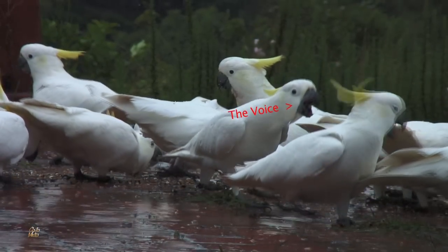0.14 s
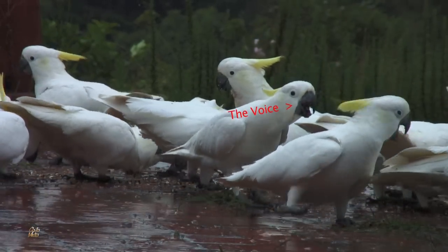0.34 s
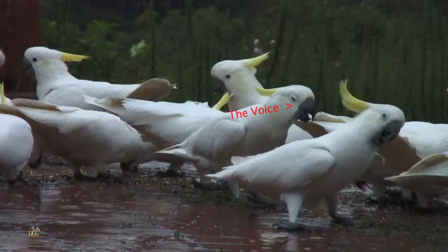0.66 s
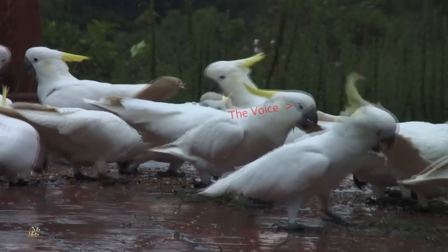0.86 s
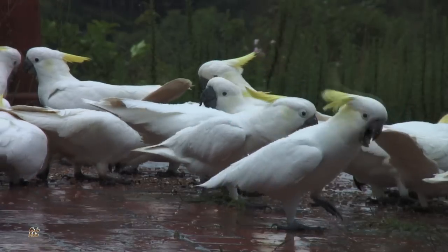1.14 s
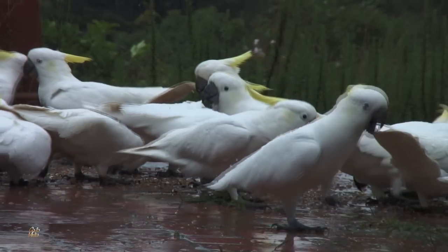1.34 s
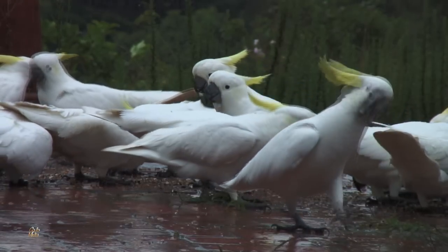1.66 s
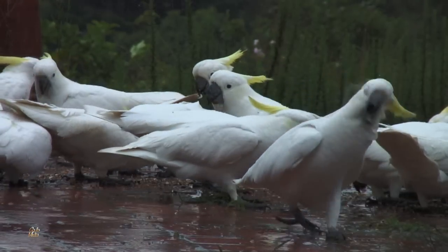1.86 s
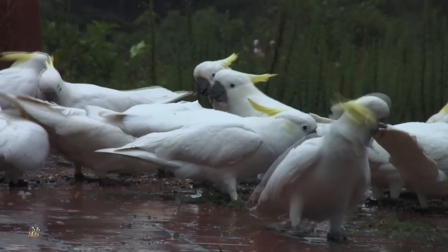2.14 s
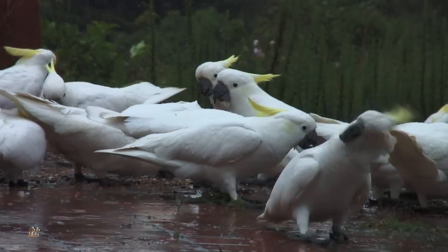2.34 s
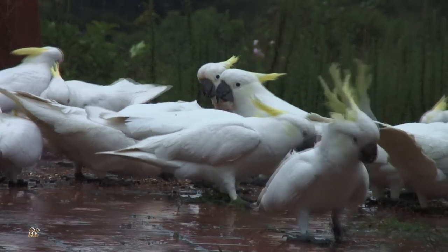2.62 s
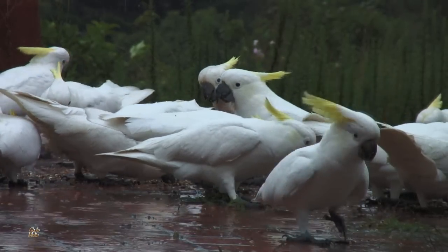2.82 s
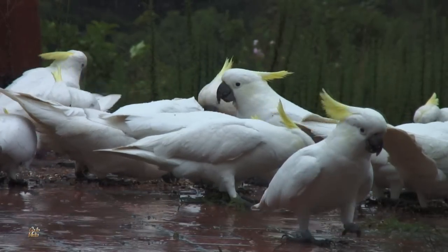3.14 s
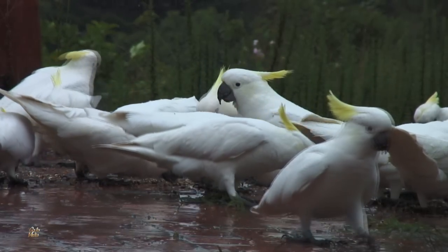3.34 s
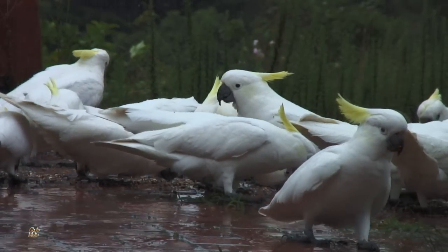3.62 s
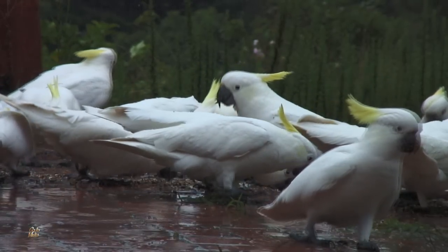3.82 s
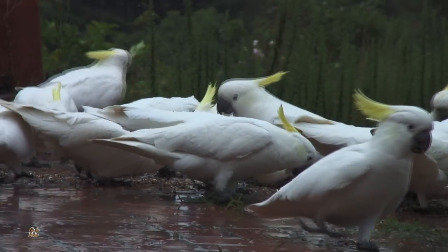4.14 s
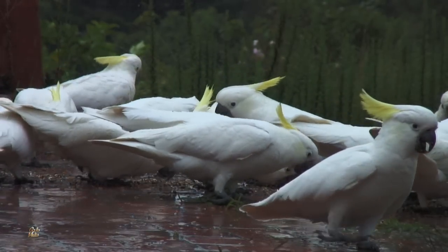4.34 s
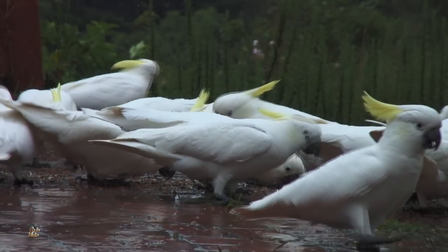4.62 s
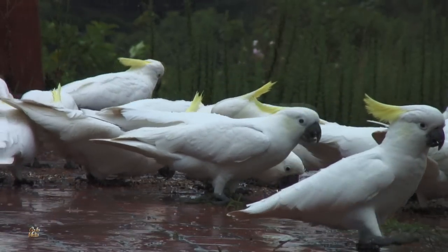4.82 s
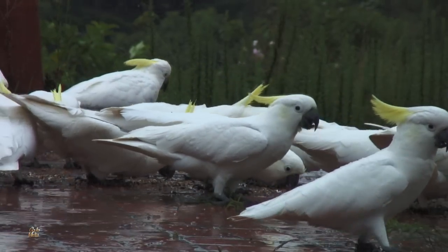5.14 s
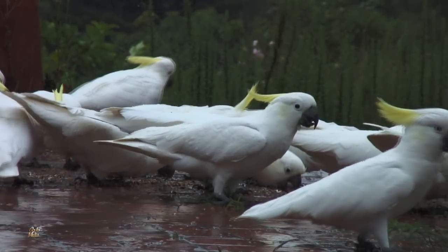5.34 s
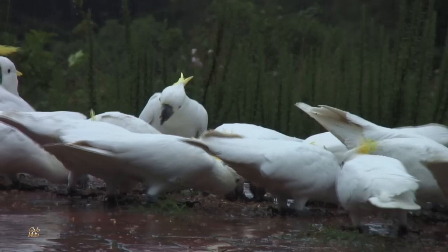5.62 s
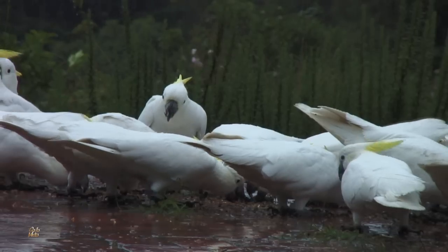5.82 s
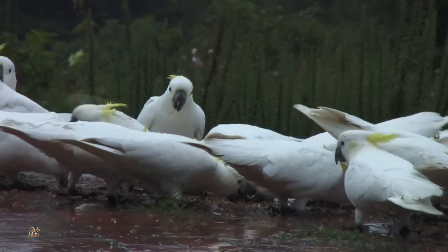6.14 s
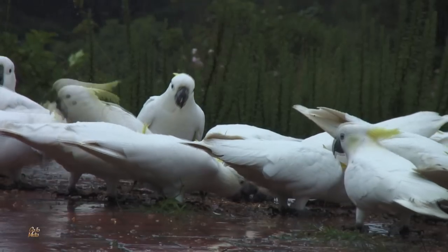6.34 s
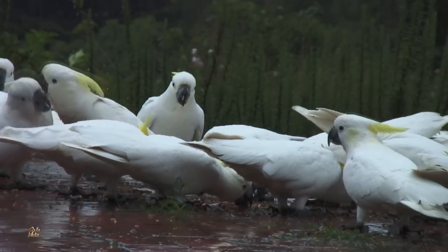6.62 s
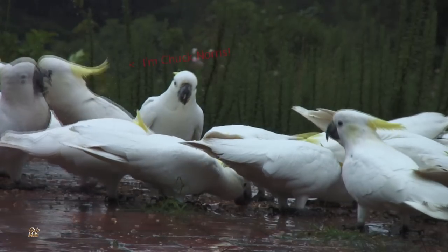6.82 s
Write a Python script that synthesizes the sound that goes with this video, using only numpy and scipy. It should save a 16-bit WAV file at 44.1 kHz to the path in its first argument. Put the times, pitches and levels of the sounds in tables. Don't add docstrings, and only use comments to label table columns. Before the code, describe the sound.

Outdoors, a feeding cockatoo flock squabbles close to the microphone. Raspy screeches overlap from the start, some slightly distorted with a low thump, mixed with whistle-led squeals and chirps. After about three and a half seconds the birds fall nearly quiet, leaving a soft wash and faint hum; a short screech and a pinched squawk follow, then a squeal and a long harsh closing screech.

```python
import sys
import numpy as np
from scipy import signal
from scipy.io import wavfile
from scipy.ndimage import uniform_filter1d

SR = 44100
rng = np.random.default_rng(int(sys.argv[2]) if len(sys.argv) > 2 else 0)


def voltage_ratio(decibels):
    exponent = np.asarray(decibels, float) / 20
    return 10 ** exponent


def unload_wav(signal):
    wavfile.write(
        sys.argv[1],
        SR,
        np.round(np.clip(np.atleast_2d(signal).T, -1, 1) * 32767).astype(np.int16),
    )


N = 307377

# frequency in Hz, level in dB.
RASP = [(300, -39), (3000, -13), (4500, -11.5), (6000, 1), (7060, -12), (7790, -1), (8600, -15.5),
        (9490, -3), (10500, -11), (11500, -9), (13000, -30), (16000, -37)]

BLUNT = dict(peak=.3, under_db=2, sag_db=3.2, release_s=.051, rasp_db=-22.5, windpipe=.42, shift_hz=50)
BRIGHT = dict(peak=.25, under_db=2.5, sag_db=1.1, release_s=.061, rasp_db=-15.5, windpipe=.32, shift_hz=-20)
SWELLING = dict(peak=.6, under_db=9, sag_db=2.6, release_s=.051, rasp_db=-19.5, windpipe=.38, shift_hz=100)
AWAY = dict(peak=.4, under_db=4, sag_db=2.4, release_s=.051, rasp_db=-29.5, windpipe=.55, shift_hz=130)
SQUAWK = dict(peak=.26, under_db=7, sag_db=2, release_s=.1, rasp_db=-25, windpipe=0, shift_hz=-250)

GLIDE = dict(bend=1.1, peak=.5, ends_db=-8.5, extra_db=2)
HOOK = dict(bend=5, peak=3, ends_db=-10.5, extra_db=-2.5)
COO = dict(bend=.5, peak=0, ends_db=-8.5, extra_db=12)
REED = dict(bend=.7, peak=1.5, ends_db=-9, extra_db=-2)


def evened(x):
    return x / np.sqrt(np.mean(x ** 2) + 1e-20)


def levelled(x):
    return x / np.sqrt(abs(uniform_filter1d(x ** 2, size=1800)) + 1e-12)


def read(points, hz):
    f, value = np.transpose(points)
    return np.interp(np.log(hz + 1), np.log(f + 1), value)


def wobble(count, hz):
    slow = signal.butter(2, hz, fs=SR, output="sos")
    return evened(signal.sosfilt(slow, rng.standard_normal(count)))


def resonate(x, hz, width):
    turn = np.exp(2j * np.pi * np.cumsum(hz * np.ones(len(x))) / SR)
    r = np.exp(-np.pi * width / SR)
    smooth = signal.lfilter([(1 - r) ** 2], [1, -2 * r, r * r], x / turn + 1e-18)
    return 2 * (turn * smooth).real


def causal(points):
    gain = read(points, abs(np.fft.fftfreq(4096, 1 / SR))) * np.log(10) / 20
    return np.fft.ifft(np.exp(gain - 1j * signal.hilbert(gain).imag)).real[:1024]


def unfold(rows):
    s, *columns = np.transpose(rows)
    t = np.arange(s[0], s[-1], 1 / SR)
    return s[0], [np.interp(t, s, c) for c in columns]


def wash():
    # frequency in Hz, level in dB per Hz.
    wash_colour = [(18, -66), (30, -54), (140, -10.5), (324, -3.5), (389, -3), (787, -3.5), (897, -1.5),
                   (1590, -3.5), (2300, -12), (4090, -14), (6720, -24), (11300, -25.5), (15500, -44)]
    frames, hz = N // 256 + 5, np.fft.rfftfreq(1024, 1 / SR)
    a, b, patches = rng.standard_normal((frames, 513, 3)).T
    patches = uniform_filter1d(patches, size=12, axis=0)
    patches = evened(uniform_filter1d(patches, size=16, axis=1))
    swell = evened(uniform_filter1d(rng.standard_normal(frames), size=30))
    z = (a + 1j * b) * voltage_ratio(read(wash_colour, hz)[:, None] + 1.5 * patches + .6 * swell)
    return evened(signal.istft(z, nperseg=1024, noverlap=768)[1][:N])


def mains_hum():
    return np.sqrt(2) * voltage_ratio(-63.5) * np.sin(2 * np.pi * 150.4 * np.arange(N) / SR)


def chatter():
    # time in seconds, level in dB.
    chatter_levels = [(0, -48), (0.851, -38.5), (2.2, -39), (2.25, -38.5), (2.95, -38.5), (3.13, -38.5),
                      (3.25, -37.5), (3.5, -49.5), (5.2, -50), (5.35, -46), (6, -49.5), (6.2, -40.5),
                      (6.97, -43.5)]
    a, b, c = voltage_ratio(2.2 * wobble(count=N, hz=60)) * rng.standard_normal((N, 3)).T
    blur = resonate(a, 2300, 2540)
    blur += voltage_ratio(-5.0) * resonate(b, 4280, 1730)
    blur += voltage_ratio(1.5) * resonate(c, 1300, 920)
    return voltage_ratio(np.interp(np.arange(N) / SR, *np.transpose(chatter_levels))) * evened(blur)


def screech_shape(start, length, effort_db, first_hz, last_hz,
                  peak, under_db, sag_db, release_s, rasp_db, windpipe, shift_hz):
    attack_s = .022
    t = np.maximum.accumulate([0, attack_s, peak * length, length - release_s, length])
    drop_db = np.array([-12 - under_db, -under_db, 0, -sag_db, -20 - sag_db])
    hz = first_hz + (last_hz - first_hz) * t / length
    share = np.clip(windpipe + .02 * drop_db, 0, 1)
    throat_hz = 2418 + shift_hz + 1.57 * (hz - 1000)
    rasp = rasp_db + .73 * drop_db + 4.5 * (t / length - .5)
    return np.transpose([start + t, effort_db + drop_db, hz, share, throat_hz, rasp])


def screech(rows):
    s, (effort_db, hz, windpipe, throat_hz, rasp_db) = unfold(rows)
    n = len(hz)
    turns = np.cumsum(hz * np.exp(.04 * wobble(count=n, hz=200) + .025 * wobble(count=n, hz=18))) / SR

    kicks = np.cumsum(180 * np.exp(.45 * wobble(count=n, hz=79.35))) / SR
    burst = uniform_filter1d(np.exp(-3 * (kicks % 1)), size=20)
    burst = evened(signal.detrend(burst)) + .4 * wobble(count=n, hz=150)

    stack = np.zeros(n)
    for k in range(2, 7):
        throat = 1 / (1 + ((k * hz - throat_hz) / 470) ** 2) + voltage_ratio(-15.0 - 6.5 * k * hz / 1000)
        stack += throat * np.cos(2 * np.pi * k * turns + k * k / 2)
    torn = evened(stack) * (.7 + np.tanh(1.2 * wobble(count=n, hz=230)))
    torn += 1.1 * windpipe * np.cos(2 * np.pi * turns) * (.8 + .8 * wobble(count=n, hz=140))

    a, b, c, d = rng.standard_normal((n, 4)).T
    air = resonate(a, throat_hz, 435)
    air += voltage_ratio(-11.5) * resonate(b, 3550, 2120)
    air += voltage_ratio(-4.5) * windpipe * resonate(c, .88 * hz, 640)

    body = voltage_ratio(1.6 * burst) * (evened(torn) + .9 * evened(air))
    body -= .7 * resonate(body, np.minimum(1.66 * hz, 1700), 520)

    snaps = np.diff(np.floor(turns), prepend=0) * voltage_ratio(4.5 * d)
    rasp = voltage_ratio(2.45 * burst) * (evened(snaps) + .5 * a)
    rasp = signal.oaconvolve(rasp, causal(RASP))[:n]
    rasp_gain = voltage_ratio(rasp_db + 2.5 + 2.2 * wobble(count=n, hz=15))
    return s, voltage_ratio(effort_db) * (levelled(body) + rasp_gain * levelled(rasp))


def purity(hz):
    return 3 + 8.5 * (hz / 1000 - 1)


def swoop_shape(s, lead_s, lead_hz, lead_db, swoop_db):
    # time in seconds, level in dB under the swoop level, pitch as a ratio to the lead-in.
    swoop_path = [(0, 0, 1), (.01, -3.5, .86), (.022, 0, .775), (.028, -14, .73)]
    t, db, ratio = np.transpose(swoop_path)
    times = s + np.r_[-lead_s, -.6 * lead_s, t]
    levels = np.r_[lead_db - 6, lead_db, lead_db, swoop_db + db[1:]]
    hz = lead_hz * np.r_[1.03, 1, ratio]
    return np.transpose([times, levels, hz, purity(hz)])


def chirp_shape(start, length, level_db, first_hz, last_hz, bend, peak, ends_db, extra_db):
    u = np.linspace(0, 1, num=24)
    hz = first_hz * (last_hz / first_hz) ** (u ** bend)
    db = ends_db * np.interp(u, [0, np.clip(peak, .1, .9), 1], [1, 0, 1]) ** 1.46
    return np.transpose([start + u * length, level_db + db, hz, purity(hz) + extra_db])


def chirp(rows):
    s, (level_db, hz, fall_db) = unfold(rows)
    n = len(hz)
    turns = np.cumsum(hz * np.exp(.0072 * wobble(count=n, hz=121))) / SR
    tone = np.zeros(n)
    for k in range(7):
        gain = voltage_ratio(-k * fall_db) / (1 + ((k + 1) * hz / 5700) ** 5)
        tone += gain * np.cos(2 * np.pi * (k + 1) * turns)
    gain = np.sqrt(2) * voltage_ratio(level_db + 1.2 * wobble(count=n, hz=90))
    return s, gain * tone * signal.windows.tukey(n, .08)


def squeal_shape(start, rough_s, clear_s, level_db, clear_hz):
    t = np.arange(0, rough_s + clear_s, .002)
    db = np.interp(t, [0, .011, .77 * rough_s, rough_s], [-12, -2.5, -5.5, 0])
    db -= 123 * np.maximum(t - rough_s - .04, 0)
    db -= 20 * np.clip(1 - (t[-1] - t) / .014, 0, 1)
    hz = np.interp(t, [0, .7 * rough_s, rough_s, rough_s + .049], [680.5, 638, 638, clear_hz])
    rough = np.interp(t, [0, rough_s, rough_s + .41 * clear_s], [.85, .454, .077])
    return np.transpose([start + t, level_db + db, hz, rough])


def squeal(rows):
    # multiple of the pitch, level in dB.
    overtones = [(1, -32), (2, -8), (3, -15), (4, -2.5), (5, -2), (6, -7.5), (7, -23), (8, -13.5), (9, -75),
                 (10, -20.5), (11, -47), (12, -25)]
    s, (level_db, hz, rough) = unfold(rows)
    n, rough = len(hz), np.clip(rough, 0, 1.5)
    turns = np.cumsum(hz * np.exp(.11 * rough * wobble(count=n, hz=300))) / SR
    stack = sum(voltage_ratio(db) * np.cos(2 * np.pi * k * turns + k * k / 2) for k, db in overtones)
    flutter = voltage_ratio(2.13 * rough * wobble(count=n, hz=255))
    air = rng.standard_normal(n)
    hiss = resonate(air, 3080, 1200) - voltage_ratio(-29) * resonate(air, 5600, 680)
    hiss += voltage_ratio(-21.5) * signal.oaconvolve(air, causal(RASP))[:n]
    return s, voltage_ratio(level_db) * levelled(flutter * (evened(stack) + 1.73 * rough * evened(hiss)))


def flock(*groups):
    mix = np.zeros(N)
    for voice, calls in groups:
        for rows in calls:
            s, sound = voice(rows)
            part = mix[round(s * SR):][:len(sound)]
            part += sound[:len(part)]
    t = np.arange(SR // 2) / SR
    scatter = rng.standard_normal(len(t)) * voltage_ratio(-60 * t / .22) * (t > .004)
    return mix + voltage_ratio(-10) * signal.oaconvolve(mix, scatter / np.linalg.norm(scatter))[:N]


def group(harsh, squeals, swoops, thin):
    screeches = [screech_shape(*r, **manner) for manner, rows in harsh for r in rows]
    whistles = [chirp_shape(*r, **manner) for manner, rows in thin for r in rows]
    whistles += [swoop_shape(*r) for r in swoops]
    return flock((screech, screeches), (squeal, [squeal_shape(*r) for r in squeals]), (chirp, whistles))


def centre_birds():
    # start in seconds, length in seconds, effort or level in dB,
    # first pitch in Hz, last pitch in Hz. Facing birds are bright, turned ones dull and hollow.
    facing = [
        (0, .155, -16, 1290, 1146),
        (6.46, .36, -14, 1040, 985),
    ]
    swells = [
        (.555, .21, -16.5, 1075, 861),
        (1.945, .13, -20.5, 965, 993),
        (2.52, 0.145, -25, 905, 886),
    ]
    blunt = [
        (.915, 0.44, -17.5, 858, 968.5),
        (1.3, 0.33, -14, 1051, 1089),
        (4.503, 0.25, -15, 981, 1028),
    ]
    turned = [(1.56, 0.22, -20.5, 1153, 1151), (1.75, 0.22, -27, 898, 889), (3.06, .22, -37.5, 1155, 1246),
              (2.61, .12, -33, 997, 1060), (4.485, 0.076, -29, 987, 976), (6.74, 0.12, -26.5, 950, 920)]
    squawks = [
        (5.477, .13, -21.5, 1168, 1191),
    ]
    chirps = [(1.815, .063, -30, 3410, 4300), (1.8, .095, -34, 1810, 2477), (1.89, 0.053, -31, 2380, 2300),
              (1.8, 0.11, -40, 2550, 3050), (2.497, 0.057, -37, 2050, 2250), (2.529, .03, -32, 2960, 3650),
              (2.548, 0.041, -30.5, 3680, 3600), (2.722, 0.029, -32, 2630, 2390),
              (2.722, .032, -24, 5260, 4780), (2.89, .1, -33, 2540, 2250),
              (3.051, 0.037, -30.5, 2600, 2070), (3.08, 0.074, -32.5, 2120, 2350),
              (3.13, 0.037, -42, 3300, 4330), (3.16, 0.096, -39, 2450, 2610),
              (3.4, 0.29, -46.5, 2463, 2460), (3.055, 0.098, -36, 3990, 4800), (3.13, .08, -41, 4790, 4580),
              (3.945, 0.043, -40, 3060, 3350), (3.945, .042, -41, 4080, 4460),
              (5.478, .13, -34, 2340, 2373), (4.241, 0.096, -46.5, 955, 940),
              (6.133, 0.03, -28, 3100, 3700), (6.15, 0.048, -40, 2620, 2480)]
    coos = [
        (1.965, .075, -25.5, 946, 934),
        (2.3, 0.132, -35.5, 896, 847),
    ]
    hooks = [
        (3.215, 0.065, -33.5, 4200, 3320),
        (3.78, .207, -47, 965, 1113),
        (6.04, .115, -30.5, 1977, 2470),
    ]
    reeds = [
        (5.48, 0.136, -42, 1165, 1182),
    ]
    # start in seconds, lead-in in seconds, lead-in in Hz, lead-in in dB, swoop in dB.
    swoops = [
        (2.698, .045, 4160, -42.5, -17),
        (6.316, .078, 3960, -31.5, -13),
    ]
    # start in seconds, rough part in seconds, clear part in seconds, level in dB, clear pitch in Hz.
    squeals = [
        (2.735, .1, 0.074, -19.5, 660),
        (3.274, .05, 0.3, -24.5, 613),
        (6.335, .095, .07, -15.5, 642),
    ]
    harsh = [(BLUNT, blunt), (BRIGHT, facing), (SWELLING, swells), (AWAY, turned), (SQUAWK, squawks)]
    return group(harsh, squeals, swoops, [(GLIDE, chirps), (HOOK, hooks), (COO, coos), (REED, reeds)])


def left_birds():
    # start in seconds, length in seconds, effort or level in dB,
    # first pitch in Hz, last pitch in Hz.
    facing = [
        (0, .385, -15, 985, 1000),
    ]
    turned = [
        (.54, 0.216, -25, 1009, 1000),
        (2.23, .35, -21, 1058, 1149),
    ]
    swells = [
        (1.31, .21, -16.5, 1050, 880),
    ]
    blunt = [
        (1.665, .49, -17.5, 857, 1040),
    ]
    chirps = [
        (3.41, 0.156, -44, 613, 600),
    ]
    # start in seconds, lead-in in seconds, lead-in in Hz, lead-in in dB, swoop in dB.
    swoops = [
        (.395, .045, 4190, -32.5, -13),
    ]
    # start in seconds, rough part in seconds, clear part in seconds, level in dB, clear pitch in Hz.
    squeals = [
        (.42, 0.0722, 0.067, -16, 668),
    ]
    harsh = [(BLUNT, blunt), (BRIGHT, facing), (SWELLING, swells), (AWAY, turned)]
    return group(harsh, squeals, swoops, [(GLIDE, chirps)])


def scene():
    left_end_s = 3.705
    hum = mains_hum()
    birds = [centre_birds() + chatter(), left_birds()]
    no_bass = signal.butter(3, 330, "highpass", fs=SR, output="sos")
    centre, left = signal.sosfilt(no_bass, birds)
    centre += voltage_ratio(-42) * wash() + hum
    left += voltage_ratio(-47) * wash() + 1.05 * hum
    return np.array([centre + left * (np.arange(N) / SR < left_end_s), centre])


def roll_off(x):
    return signal.sosfilt(signal.butter(12, 16260, fs=SR, output="sos"), x)


def record(dry):
    # from in seconds, to in seconds.
    blasts = [
        (0, .33),
        (1.48, 1.75),
        (4.53, 4.6),
        (6.549, 7.7),
    ]
    soft = 1.1 * np.tanh(dry / 1.1)
    t = np.arange(N) / SR
    over = np.maximum(soft - .33, 0) * sum((t > a) & (t < b) for a, b in blasts)
    thump = signal.sosfilt(signal.butter(2, [5, 70], "bandpass", fs=SR, output="sos"), over)
    mix = soft - voltage_ratio([[6.5], [.6]]) * thump
    treble_edge = signal.firwin(301, 15500, fs=SR)
    return roll_off(signal.oaconvolve(mix, treble_edge[None], "same"))


dry = scene()
out = record(dry)
unload_wav(out)
```